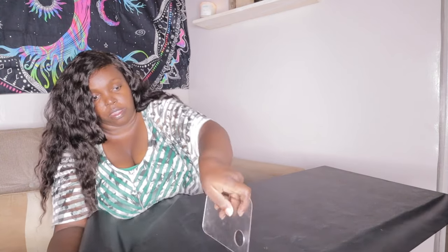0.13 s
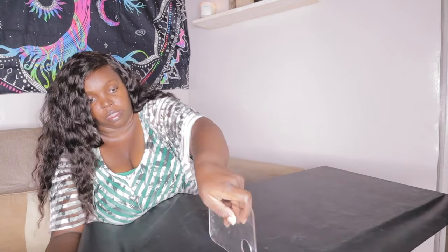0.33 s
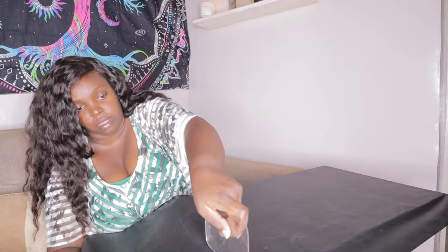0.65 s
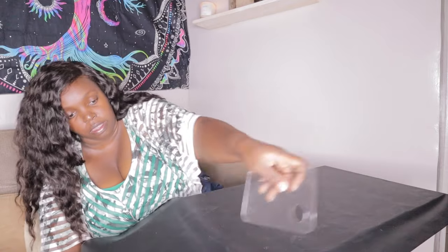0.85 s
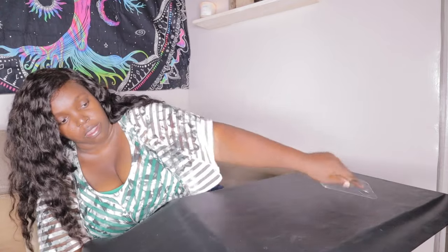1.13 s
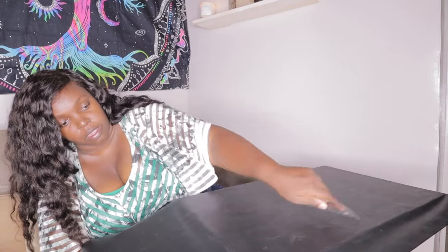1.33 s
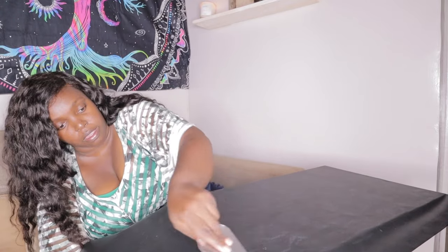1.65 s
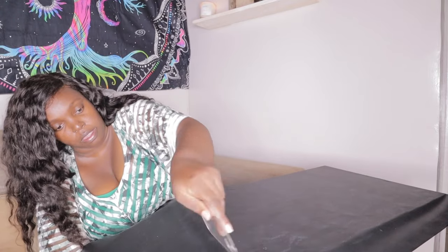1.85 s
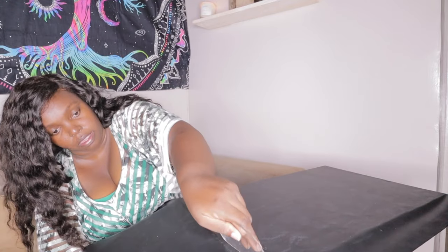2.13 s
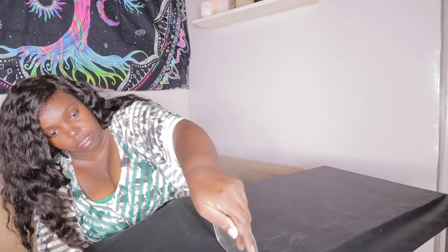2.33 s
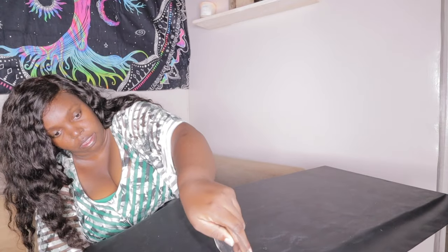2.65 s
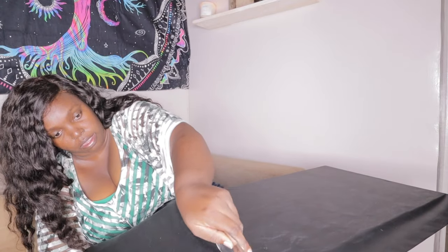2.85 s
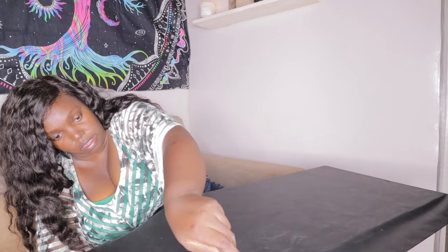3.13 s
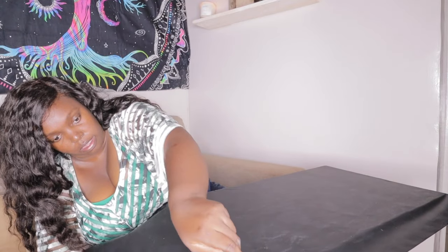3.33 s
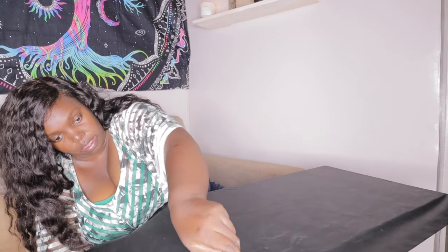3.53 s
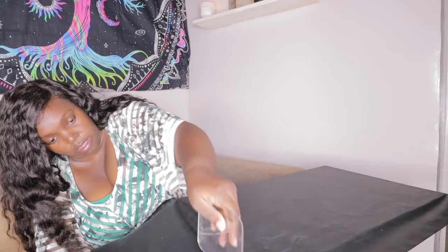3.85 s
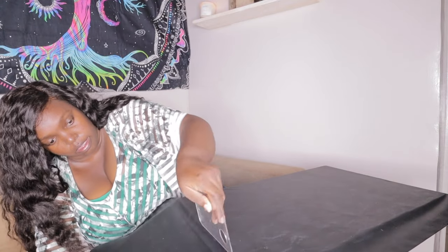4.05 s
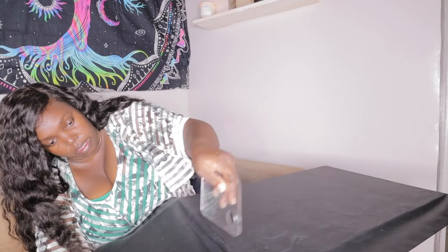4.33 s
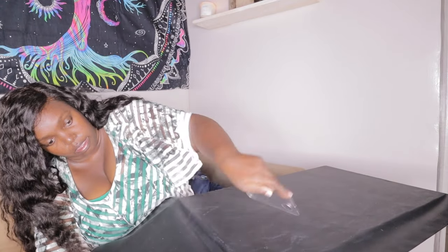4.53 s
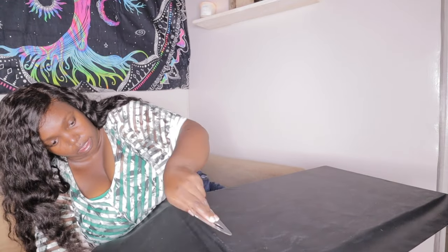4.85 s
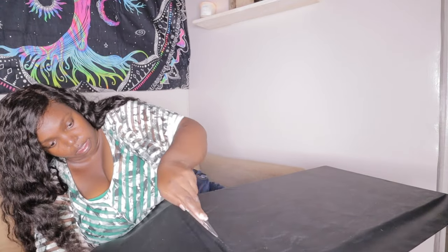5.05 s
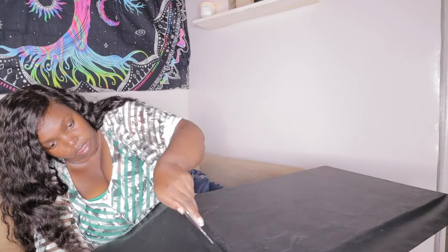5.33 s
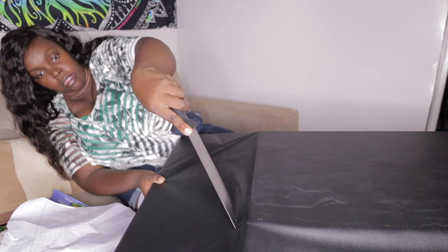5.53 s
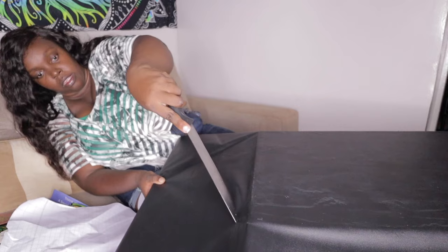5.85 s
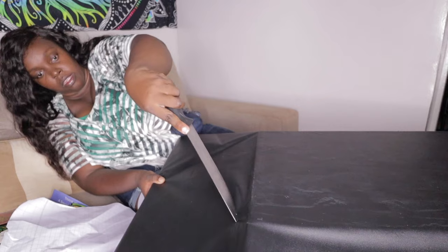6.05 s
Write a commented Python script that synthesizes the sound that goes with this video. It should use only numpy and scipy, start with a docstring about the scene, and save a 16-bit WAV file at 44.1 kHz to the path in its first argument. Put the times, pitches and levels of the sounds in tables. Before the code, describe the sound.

Close wide stereo in a small bare room: a plastic card makes short scratchy rubs on vinyl film while a hand rustles and creases tick. A sharp tap begins a long loud swish, then knocks and small rubs follow. After a quieter spell come another tap, a brisk sweep and short scrapes. The sound dips, then a knife blade slides faintly and clicks. Low room noise and faint hums lie underneath.

```python
"""A plastic card smooths self-adhesive vinyl onto a desk in a small, bare room, with faint hums over steady noise.
From the start the card scrapes (coloured friction noise), a hand rustles (dull noise), and the film crinkles and
ticks (sparse clicks). From 1.3 s the card also knocks on the desk (clicks that excite its modes) and makes long
sweeps. The level dips briefly after 5.5 s; then a knife blade slides on the film and clicks once near 6.1 s.
A camera with a wide stereo microphone stands close by."""
import sys
import numpy as np
from scipy import signal
from scipy.fft import rfft, irfft, next_fast_len
from scipy.io import wavfile
from scipy.ndimage import uniform_filter1d

SR = 44100
rng = np.random.default_rng(int(sys.argv[2]) if len(sys.argv) > 2 else 0)


def unload_wav(signal):
    """Save mono or channel-first audio to the path in sys.argv[1] as 16-bit WAV at rate SR, clipped to [-1, 1]."""
    wavfile.write(
        sys.argv[1],
        SR,
        np.round(np.clip(np.atleast_2d(signal).T, -1, 1) * 32767).astype(np.int16),
    )


N = 273401
TIME, FREQS = np.arange(N) / SR, np.fft.rfftfreq(N, 1 / SR)
CLOCK = np.arange(0, N, 64) / SR  # coarse time grid of the strokes, s

# spectrum of a snapping crease or a ticking edge: (frequency [Hz], relative density [dB per Hz])
TICK_SPECTRUM = [(80, -6.5), (300, -14), (800, 5.5), (2200, 10), (4500, -3), (8000, -16), (12000, -20),
                 (15500, -54)]


def amp(db):
    """Amplitude ratio: 20 dB for each factor of ten."""
    return 10 ** (np.asarray(db) / 20)


def unit(x):
    """Normalises a signal to an rms of 1, that is to unit mean power."""
    return x / np.sqrt(np.mean(x ** 2) + 1e-20)


def read(points, hz):
    """Interpolates a curve at hz on a logarithmic frequency axis."""
    f, value = np.transpose(points)
    return np.interp(np.log(hz + 1), np.log(f + 1), value)


def add(mix, s, sound):
    """Superposition: adds a sound to the mix from time s on."""
    part = mix[max(round(s * SR), 0):][:len(sound)]
    part += sound[:len(part)]


def shaped(x, gain):
    """Linear filtering: multiplies the spectrum of a full-length signal by a gain at each of FREQS."""
    return irfft(rfft(x) * gain, N)


def above(hz, corner_hz):
    """High-pass weighting: a smooth step from 0 below the corner to 1 above it."""
    return hz ** 4 / (hz ** 4 + corner_hz ** 4)


def bump(hz, centre_hz, octaves):
    """A broad resonance of height 1, Gaussian on an octave scale."""
    return np.exp(-.5 * (np.log2((hz + 1) / centre_hz) / octaves) ** 2)


def wander(rate_hz):
    """Slow random fluctuation: low-passed noise of rms 1."""
    return unit(shaped(rng.standard_normal(N), 1 - above(FREQS, rate_hz)))


def pulse(colour_db, size=2048):
    """Minimum phase: the sharpest causal click of energy 1 with a colour given as a function of Hz."""
    log_gain = np.log(amp(colour_db(abs(np.fft.fftfreq(size, 1 / SR)))))
    click = np.fft.ifft(np.exp(np.conj(signal.hilbert(log_gain)))).real
    return click / np.linalg.norm(click)


def grains(per_s, spread_db):
    """Random impulses: sparse clicks of uneven size and either sign, rms 1 in all."""
    size = amp(spread_db * np.minimum(rng.exponential(1, N), 4))
    sign = rng.choice([-1, 1], N)
    occurs = rng.random(N) < per_s / SR
    return unit(size * sign * occurs)


def air(level_db=-63.5, side_db=11.5):
    """Stationary noise: the steady noise of room and microphone, independent in mid and side."""
    # (frequency [Hz], relative density [dB per Hz])
    noise_spectrum = [(12, -24.5), (20, -23), (50, 2.5), (74, -9.5), (87, 2), (109, -19.5), (144, -8.5),
                      (202, -14), (238, -5.5), (342, -18.5), (649, -19), (725, -24.5), (2030, -33.5),
                      (15500, -61)]
    gain = amp(read(noise_spectrum, FREQS))
    mid, side = (unit(shaped(z, gain)) for z in rng.standard_normal((2, N)))
    return amp(level_db) * np.array([mid, amp(side_db) * side])


def humming(waver_hz=1.57):
    """Frequency modulation: low sine tones with a random drift of pitch swell and fade."""
    # faint low hums that come and go: (start [s], end [s], frequency [Hz], level at the height of the swell [dB])
    hums = [(-.1, 0.167, 239.5, -53), (0.248, 0.486, 238.3, -59.5), (0.658, 1.07, 184.6, -55),
            (2.78, 3.315, 185, -65.5), (4.91, 5.277, 186, -52.5), (5.4, 5.604, 115.8, -51)]
    out, drift_hz = np.zeros(N), waver_hz * wander(rate_hz=3.8)
    for start, end, hz, db in hums:
        swell = np.sin(np.pi * np.clip((TIME - start) / (end - start), 0, 1))
        phase = 2 * np.pi * np.cumsum(hz + drift_hz) / SR
        out += amp(db) * np.sqrt(2) * swell * np.sin(phase)
    return out


def short_rub(s, rise, fall, db, treble_db, hand_db):
    """Friction follows speed: level, swish and hand rub of a short stroke rise and fall together."""
    drop_db, shape = 10.5, 1.32  # fall of level one rise before and one fall after the height; 1 pointed, 2 round
    peak_swish_hz, octaves_per_db = 2106, 0.2  # the swish sinks as the rub slows
    distance = abs(CLOCK - s) / np.where(CLOCK < s, rise, fall)
    speed_db = -drop_db * distance ** shape
    swish_hz = peak_swish_hz * 2 ** (octaves_per_db * speed_db)
    return db + speed_db, treble_db, swish_hz, hand_db + speed_db


def sweep(curve, lift_db_per_s=499, hand_db=-30):
    """Friction along a path: a long stroke follows drawn curves and dies away fast beyond its ends."""
    s, *columns = np.transpose(curve)
    db, treble_db, swish_hz = (np.interp(CLOCK, s, c) for c in columns)
    db = db - lift_db_per_s * abs(CLOCK - np.clip(CLOCK, s[0], s[-1]))
    return db, treble_db, swish_hz, db + hand_db


def motion():
    """Power summation of all strokes: card gain, treble dB, swish Hz and hand gain; power weights the colour."""
    # short rubs of the card, the last two of the blade: (time of the height [s], rise [s], fall [s],
    # relative level [dB], relative treble [dB], relative level of the hand's dull rub [dB])
    rubs = [ (.24, 0.023, 0.053, -49, -0.5, -42.5), (.45, 0.13, 0.15, -56, -3.5, -53),
            (.63, .015, .055, -57.5, -3, -56.5), (0.733, 0.015, 0.056, -44, -3.5, -49),
            (.91, 0.3, 0.13, -54, -20, -48), (.985, 0.012, 0.035, -47, -14, -59.5),
            (1.195, 0.021, 0.032, -52, -21, -48.5), (1.305, 0.013, 0.023, -55, -17, -55),
            (1.775, 0.024, .06, -40.5, -11, -51.5), (1.92, 0.1, 0.06, -48, -4.5, -45),
            (2.062, 0.0093, 0.035, -68, 13, -66), (2.258, 0.044, 0.021, -48.5, -13.5, -48.5),
            (2.355, 0.026, .04, -54, -17, -50.5), (2.503, 0.022, 0.032, -51.5, -7, -46.5),
            (2.639, 0.039, 0.075, -51.5, -5.5, -54.5), (2.76, 0.15, 0.22, -61.5, -16.5, -58.5),
            (2.985, .04, 0.062, -61, -10, -56), (3.055, .025, 0.054, -59.5, -3.5, -53.5),
            (3.215, 0.054, 0.22, -56.5, -9.5, -53.5), (3.33, 0.084, .06, -58, 2, -56.5),
            (3.47, 0.14, 0.1, -59, -17, -50), (3.689, 0.023, 0.029, -48.5, -21, -54),
            (3.765, 0.017, 0.058, -52.5, -21, -49.5), (3.845, 0.076, 0.077, -45, -7, -48.5),
            (3.96, 0.072, 0.071, -62, -19, -51), (4.36, 0.18, 0.17, -60, -16.5, -66),
            (4.65, 0.061, .03, -66, -24, -77), (5.135, 0.056, 0.061, -45.5, -10, -48.5),
            (5.313, .042, 0.032, -42.5, -4.5, -42.5), (5.42, 0.14, 0.069, -61.5, -13, -57.5),
            (5.511, 0.019, 0.056, -61, -2, -49.5), (5.81, 0.097, .08, -66, 1, -56.5),
            (5.97, 0.078, 0.058, -65, 0, -57), ]
    # long sweeps of the card, one curve each:
    # (time [s], relative level [dB], relative treble [dB], centre of the swish [Hz])
    sweeps = [
        [(1.335, -41, -14, 2460), (1.373, -28.5, -18, 2700), (1.433, -29, -10.5, 2130),
         (1.549, -26.5, -9.5, 2700), (1.595, -31.5, -8.5, 2370), (1.643, -33, -12.5, 1550),
         (1.685, -36.5, -10, 1610), (1.779, -34.5, -9.5, 1760), (1.865, -40.5, -8, 1730)],
        [(3.35, -60, 5, 6000), (3.385, -41.5, -15, 4800), (3.415, -36.5, -14, 2380), (3.45, -39.5, -9.5, 1720),
         (3.52, -49, -19, 1490)],
        [(4.725, -41, -16, 1600), (4.775, -32.5, -10.5, 1820), (4.833, -35, -8.5, 2380), (4.865, -35, -9, 2150),
         (4.915, -37, -10.5, 1680), (4.961, -43, -8.5, 1770), (5.04, -65, -15, 1720)],
    ]
    # the hand never lies quite still: (relative level [dB], relative treble [dB], centre of the swish [Hz],
    # relative level of the hand's dull rub [dB])
    resting = (-68.5, -11, 1598, -65.5)
    strokes = [sweep(curve) for curve in sweeps] + [short_rub(*row) for row in rubs] + [resting]
    db, treble_db, swish_hz, hand_db = (np.array(np.broadcast_arrays(*column)) for column in zip(*strokes))
    power = amp(db) ** 2
    treble_db, swish_hz = (np.average(c, axis=0, weights=power) for c in (treble_db, swish_hz))
    card_gain = np.sqrt(power.sum(axis=0))
    hand_gain = np.linalg.norm(amp(hand_db), axis=0)
    return card_gain, treble_db, swish_hz, hand_gain


def scraping(gain, bright_db, centre_hz, level_db=-.5, treble_db=10.5, split_hz=4300, catch_db=-9, judder_db=0.66,
             swish_db=7, swish_octaves=0.45, overtone_db=0.5, hollow_db=-6, patchy_db=2.0):
    """Friction noise: the edge drags over fine grain and catches; rows are two independent noises."""
    # (frequency [Hz], relative density [dB per Hz])
    scrape_spectrum = [(150, -28), (300, -13.5), (650, -3.5), (1100, 2), (1400, 3.5), (2100, -1.5),
                       (3000, -1.5), (4000, -2.5), (5500, -5), (7500, -12), (11200, -15), (13500, -25.5),
                       (15500, -36)]
    # faint resonances of the bent card while it slides: (frequency [Hz], width [Hz], added gain at the peak [dB])
    card_modes = [(1524, 250, -37), (2640, 900, -28), (3840, 110, -10)]
    catches = np.array([grains(per_s=260, spread_db=1) for _ in range(2)])
    slips = rng.standard_normal((2, N)) + amp(catch_db) * catches
    slips *= amp(judder_db * wander(rate_hz=57))
    hz, t, z = signal.stft(slips, SR, nperseg=512)
    hz, swish_hz = hz[:, None], np.interp(t, CLOCK, centre_hz)
    card = 1 + sum(amp(db) / (1 + (2 * (hz - f) / width) ** 2) for f, width, db in card_modes)
    # the wedge of air under the card rings like a short closed pipe:
    # odd multiples of the swish stand out, and the sound thins out below it
    wedge_db = swish_db * bump(hz, swish_hz, swish_octaves)
    wedge_db += overtone_db * bump(hz, 3 * swish_hz, swish_octaves / 2)
    thin_db = hollow_db * (1 - above(hz, swish_hz / 2))
    colour = card * amp(read(scrape_spectrum, hz) + wedge_db + thin_db)
    # the colour of the scrape fluctuates at random in patches of time and frequency
    patches = uniform_filter1d(rng.standard_normal(colour.shape), size=8, axis=1)
    patches = uniform_filter1d(patches, size=3, axis=0)
    colour *= amp(patchy_db * unit(patches))
    colour /= np.sqrt(np.mean(colour ** 2, axis=0))
    colour *= amp((np.interp(t, CLOCK, bright_db) + treble_db) * above(hz, split_hz))
    rub = signal.istft(z * colour, SR, nperseg=512)[1][:, :N]
    return amp(level_db) * np.interp(TIME, CLOCK, gain) * rub


def rustling(gain, level_db=-1.5, flutter_db=2):
    """Amplitude-modulated noise: hand and arm push on the film with a dull, uneven rub."""
    # (frequency [Hz], relative density [dB per Hz])
    rustle_spectrum = [(40, 1), (70, -25), (110, 4), (160, -3), (230, 0), (400, -2), (630, -1), (850, -6),
                       (1200, -7.5), (3000, -67.5)]
    push = rng.standard_normal(N) * amp(flutter_db * wander(rate_hz=29))
    dull = unit(shaped(push, amp(read(rustle_spectrum, FREQS))))
    return amp(level_db) * np.interp(TIME, CLOCK, gain) * dull


def desk(force, build_cycles=5):
    """Modal ringing: desk top and card ring on after a force; each mode needs some cycles to build up."""
    # (frequency [Hz], relative level [dB], t60 [s])
    desk_modes = [(397.2, 7.5, 0.15), (500, -24.5, 0.096), (639.3, 6, 0.085), (1139, -6, 0.21),
                  (1244, -2, 0.24), (1530, -21.5, 0.055), (1770, -9, 0.19), (2005, -4, 0.21),
                  (2390, -6, 0.15), (2820, -7, 0.089), (3520, -20.5, .18), (3360, -20, .18)]
    t = np.arange(SR // 2) / SR
    ring = np.zeros(len(t))
    for hz, db, t60 in desk_modes:
        decay = amp(db - 60 * t / t60)
        build_up = 1 - np.exp(-hz * t / build_cycles)
        ring += decay * build_up * np.sin(2 * np.pi * hz * t)
    return signal.fftconvolve(force, ring / np.linalg.norm(ring))[:N]


def crinkling(gain, level_db=-11):
    """Random impulse noise: tiny creases snap at random under the hand."""
    snaps = np.interp(TIME, CLOCK, gain) * grains(per_s=70, spread_db=-1)
    click = pulse(lambda hz: read(TICK_SPECTRUM, hz))
    return amp(level_db) * signal.oaconvolve(snaps, click)[:N]


def blow(colour_db, db, bass_db, treble_db, length, chatter=.1, rise=0.39, bass_hz=700, treble_hz=3600, size=4096):
    """Impact: a contact is one click and a chatter of smaller ones that swells and dies."""
    draw, age = rng.standard_normal(size), np.arange(size) / max(length * SR, 1)
    force = chatter * draw * abs(draw) * np.exp(-age) * (1 - np.exp(-age / rise))
    force[0] = 1
    click = pulse(lambda hz: colour_db(hz) + bass_db * (1 - above(hz, bass_hz)) + treble_db * above(hz, treble_hz))
    hit = signal.fftconvolve(force, click)
    window = .004 * SR  # the level counts as rms over 4 ms
    return amp(db) * np.sqrt(window) * hit / np.linalg.norm(hit)


def ticking():
    """Light impacts: creases snap, an edge ticks and the blade clicks, all too lightly to ring the desk."""
    # (time [s], level [dB], bass [dB], treble [dB], chatter time [s])
    ticks = [(0.053, -50.5, 5, 9.5, 0.0046), (.172, -44.5, 30, 8, 0.018), (.229, -35.5, 17, -15, 0.0058),
             (.277, -44.5, -8, 13, 0.0082), (.529, -44, -17, -30, 0.0044), (0.623, -40.5, 17, 18.5, 0.0013),
             (.632, -46, 15, 0, 0.0017), (0.717, -32.5, 12, -18, 0.015), (0.743, -39.5, 21, -18, 0.0086),
             (0.885, -35.5, -15, 5.5, 0.00037), (.932, -37.5, -14, -2.5, 0.0029),
             (.975, -41.5, -2, 13, 0.013), (1.12, -44, 20, -3, 0.0015), (1.131, -45, 14, -22, 0.0015),
             (1.188, -38.5, -3, 8, 0.0047), (2.133, -46, 20, 6, 0.0019), (2.35, -48.5, -2, 13, 0.0088),
             (2.466, -49.5, -9, -18, 0.0084), (3.561, -36.5, -10, 7, 0.0077), (3.677, -45.5, -9, 2, 0.0046),
             (3.746, -41.5, 18, -18, 0.009), (3.955, -43.5, 3, -23, 0.002), (3.969, -41, 15, -2, 0.0033),
             (4.102, -44.5, 0, -5, 0.0019)]
    # the knife blade clicks once: (time [s], level [dB])
    knife_click = (6.0769, -32.5)
    # colour of the blade: (frequency [Hz], relative density [dB per Hz])
    blade_spectrum = [(100, -18), (500, -11), (1200, -0.5), (1900, -6), (2600, -2.5), (3500, -17),
                      (4500, -5), (5800, -2.5), (7500, -17), (11000, -17.5), (15500, -39)]
    out = np.zeros(N)
    for s, *contact in ticks:
        add(out, s, blow(lambda hz: read(TICK_SPECTRUM, hz), *contact, chatter=0.15, rise=0.18))
    s, db = knife_click
    click = blow(lambda hz: read(blade_spectrum, hz), db, bass_db=0, treble_db=0.0, length=0.00034, chatter=0.099)
    add(out, s, click)
    return out


def knocking(contact_db=4, contact_octaves=0.2, ring_db=-8.0):
    """Impact excitation: card and hand land; each spot has its own pitch and rings the desk more or less."""
    # (time [s], level [dB], bass [dB], treble [dB], chatter time [s], pitch of the contact [Hz],
    # relative desk ring [dB])
    knocks = [(1.2748, -26, -11, 1.5, 0.0024, 1500, -25), (1.2837, -16.5, -7, 1, 0.0011, 1500, -26),
              (1.2869, -25.5, 3, -29, 0.006, 192, -33), (1.877, -30, -10, 11.5, 0.0048, 1600, -22),
              (1.884, -18.5, -6.5, 13.5, 0.01, 2010, -7.5), (2.1482, -28.5, -4.5, -11, 0.0047, 980, -17),
              (2.1511, -23.5, -10, -9, 0.0019, 1600, -4.5), (2.266, -32, 2.5, 9.5, 0.0052, 1750, -31),
              (2.281, -30, -2, -79, 0.004, 1050, -7.5), (2.486, -48.5, 24, -5, 0.014, 220, -22),
              (4.2463, -28, 2.5, -9, 0.0062, 1210, -6.5), (4.6843, -25.5, 5, 3, 0.0034, 1710, -12),
              (4.707, -29, -2, -14, 0.0066, 1250, -20), (5.309, -33.5, -19, -5, 0.0056, 2170, -6.5),
              (5.476, -46, 29, -8, 0.0031, 397, -13), (5.499, -43.5, 0, -46, 0.002, 1180, -28.5),
              (5.513, -46.5, 30, -11, 0.0075, 289, -24), (6.0648, -46, 11, -44, 0.00065, 597, -12)]
    # (frequency [Hz], relative density [dB per Hz])
    knock_spectrum = [(60, -12), (130, -10), (240, -3), (380, 1), (700, 0), (1400, -1.5), (2800, -5.5),
                      (4200, -17), (8000, -29.5), (15000, -45.5)]
    out = np.zeros(N)
    for s, db, bass_db, treble_db, length, pitch_hz, spot_db in knocks:
        def colour_db(hz):
            return read(knock_spectrum, hz) + contact_db * bump(hz, pitch_hz, contact_octaves)

        contact = (colour_db, db, bass_db, treble_db, length)
        add(out, s, blow(*contact, chatter=0.28))
        # one clean click drives the desk ring, so its level stays steady
        add(out, s, amp(ring_db + spot_db) * desk(blow(*contact, chatter=0)))
    return out


def room_tail(build_s=0.0003):
    """Reverberation: dense reflections of energy 1, each band decaying at its own speed."""
    # (frequency [Hz], t60 [s])
    decay_times = [(150, 0.29), (500, 0.23), (1400, 0.29), (3700, 0.23), (10000, 0.17)]
    hz, t, z = signal.stft(rng.standard_normal(SR // 2), SR, nperseg=256)
    decay = np.exp(-np.log(1000) * t / read(decay_times, hz)[:, None])
    tail = signal.istft(z * decay, SR, nperseg=256)[1]
    tail *= 1 - np.exp(-np.arange(len(tail)) / SR / build_s)
    return tail / np.linalg.norm(tail)


def room(x, wet_db, side_phase=2.1, side_db=0, spread_db=0.5):
    """Direct and diffuse field in mid and side: direct sound a little to the right, reflections all round."""
    analytic = signal.hilbert(x, next_fast_len(N))[:N]
    turned = (analytic * np.exp(-1j * side_phase)).real  # side_phase in radians
    tails = np.array([signal.fftconvolve(x, room_tail())[:N] for _ in range(2)])
    direct = np.array([x, amp(side_db) * turned])
    return direct + amp([[wet_db], [wet_db + spread_db]]) * tails


def scene(rub_side_db=-6):
    """Superposition of knocks, ticks, scraping and rustling in the room, over hums and steady noise."""
    card_gain, bright_db, swish_hz, hand_gain = motion()
    rub, rub_side = scraping(card_gain, bright_db, swish_hz)
    hand = rustling(hand_gain)
    sound = room(knocking(), wet_db=-4.5, side_phase=2.1, side_db=-3.0)
    sound += room(ticking() + crinkling(hand_gain), wet_db=-4.0, side_phase=1.73, side_db=-2.5)
    sound += room(rub + amp(-31.5) * desk(rub), wet_db=-11.5, side_phase=1.9, side_db=-5.5, spread_db=4.0)
    sound[1] += amp(rub_side_db) * rub_side  # independent scrape noise in the side widens the scrape
    sound += room(hand + amp(-25) * desk(hand), wet_db=-5.0, side_phase=1.66, side_db=-2.0)
    sound[0] += humming()
    # the level dips briefly between the work with the card and the work with the knife
    sound *= np.interp(TIME, [5.532, 5.538, 5.62, 5.7], [1, .15, .4, 1])
    mid, side = sound + air()
    return np.array([mid + side, mid - side])


def record(dry, rumble_hz=30, edge_hz=15600):
    """Mid-side filtering: no deep rumble in the mid, narrow bass, wide treble; then a low-pass at edge_hz."""
    # stereo width of the microphone: (frequency [Hz], gain of the side [dB])
    side_width = [(50, -41.5), (170, -20.5), (350, -12), (700, -6.5), (1400, -2), (2800, 3), (5500, 5.5),
                  (10000, 9), (15000, 8.5)]
    mid = shaped(dry.mean(0), above(FREQS, rumble_hz))
    side = shaped((dry[0] - dry[1]) / 2, amp(read(side_width, FREQS)))
    low_pass = signal.firwin(511, edge_hz, window=("kaiser", 9), fs=SR)
    return signal.oaconvolve(np.array([mid + side, mid - side]), low_pass[None], "same")


dry = scene()
out = record(dry)
unload_wav(out)
```